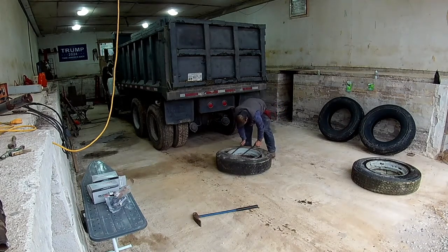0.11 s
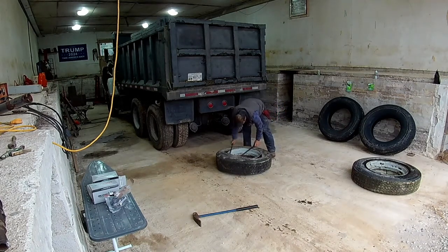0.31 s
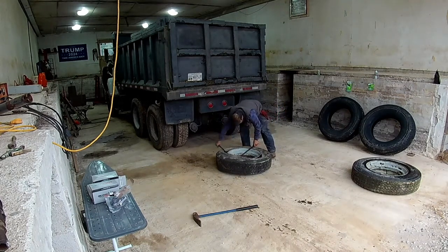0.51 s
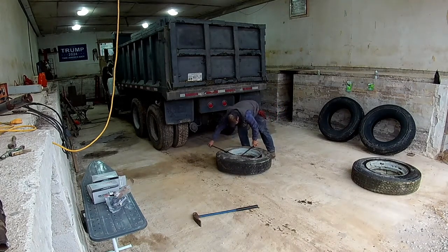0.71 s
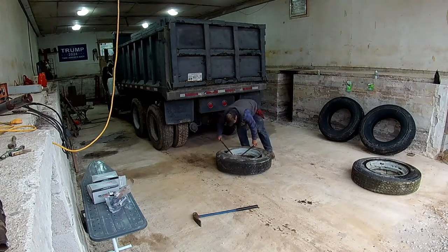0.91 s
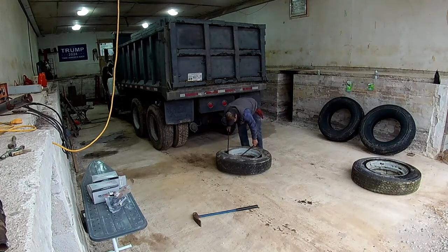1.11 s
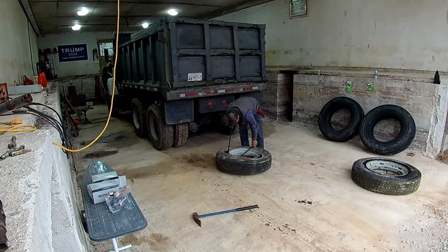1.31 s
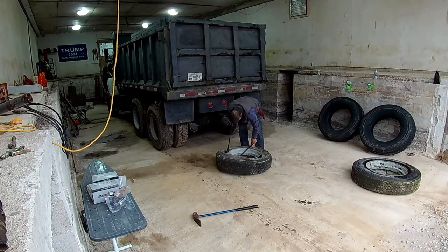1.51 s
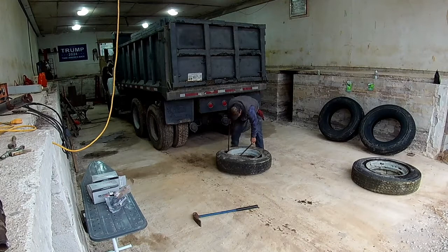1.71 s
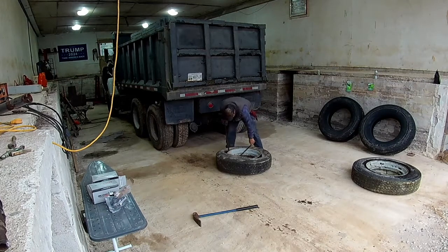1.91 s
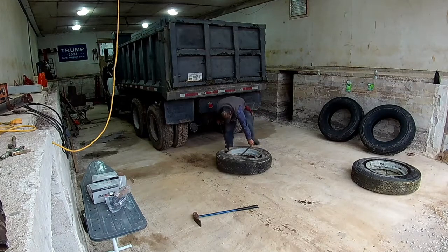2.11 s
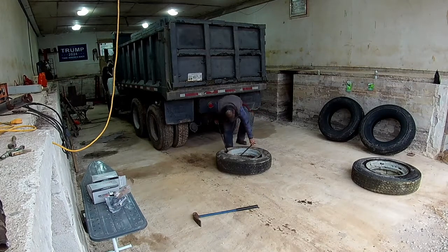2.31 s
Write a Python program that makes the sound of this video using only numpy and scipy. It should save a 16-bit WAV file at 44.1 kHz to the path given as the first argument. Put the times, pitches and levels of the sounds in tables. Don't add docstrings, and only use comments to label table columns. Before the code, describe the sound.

Heavy rubber tire thudding on concrete, tire irons knocking its metal rim, hard garage bay echo

```python
import sys
import numpy as np
from scipy import signal
from scipy.fft import rfft, irfft
from scipy.io import wavfile
from scipy.ndimage import uniform_filter1d

SR = 44100
rng = np.random.default_rng(int(sys.argv[2]) if len(sys.argv) > 2 else 0)


def store_pcm(level_fs):
    pcm = np.round(np.clip(level_fs, -1, 1) * 32767).astype(np.int16)
    wavfile.write(sys.argv[1], SR, np.atleast_2d(pcm).T)


def makeup_ratio(level_db):
    decades = np.asarray(level_db, float) / 20
    return 10 ** decades


N = 110250

# start_s, thud_db, favoured_pitch_hz, clatter_db, clatter_cutoff_hz
BLOWS = [(.214, -28.5, 162, -27.5, 3240), (0.233, -34.5, 136, -45.5, 4000), (.553, -36.5, 236, -77, 1500),
         (0.589, -31.5, 102, -44, 3930), (0.613, -38, 162, -41.5, 5340), (0.727, -42.5, 176, -54.5, 1510),
         (.810, -45.5, 302, -42.5, 2220), (1.080, -57, 162, -46.5, 5250), (1.094, -26, 160, -29.5, 2640),
         (1.107, -31.5, 189, -33.5, 3900), (1.133, -34.5, 180, -38, 5140), (1.29, -46.5, 300, -91, 5250),
         (1.976, -84, 300, -41.5, 4270), (2.297, -39, 104, -88, 990), (2.389, -42.5, 100, -75, 1730),
         (2.443, -42.5, 144, -55, 1200), (2.475, -43, 104, -51, 1290)]
# mode_hz, level_db, t60_s
TIRE_MODES = [(71, -20.5, 0.095), (100.5, 4.5, 0.28), (128, 3, 0.19), (176, 5, 0.3), (201.8, -3, 0.17),
              (242.6, 3.5, 0.11), (300, -1, 0.41), (407.3, 8, 0.1)]
# start_s, level_db, favoured_pitch_hz
FLANGE_HITS = [
    (.2135, -28, 1710),
    (.218, -29, 597),
    (.227, -31.5, 980),
    (.232, -33, 1700),
    (.247, -31.5, 1077),
    (.291, -32.5, 1110),
    (.598, -47.5, 397),
    (.605, -38.5, 1540),
    (1.0955, -37.5, 1500),
    (1.108, -34.5, 1150),
]
# start_s, level_db, favoured_pitch_hz
DISC_HITS = [
    (.8105, -48, 1236),
    (.822, -43, 570),
    (1.975, -40, 1720),
    (1.983, -45, 590),
    (1.989, -43.5, 920),
    (2.475, -68, 1150),
]
# mode_hz, level_db, t60_s
FLANGE_MODES = [(356, -5, 0.066), (457, -6.5, 0.06), (573, 7, 0.026), (772, -4.5, 0.033), (980, 5, 0.04),
                (1042, 0.5, 0.057), (1150, 3, 0.041), (1263, -5, 0.06), (1397, -0.5, 0.035),
                (1516, -6.5, 0.039), (1672, -3, 0.024), (2065, -7, 0.047), (3712, -13.5, 0.065),
                (3985, -14, 0.042)]
# mode_hz, level_db, t60_s
DISC_MODES = [(567, 3.5, 0.075), (868, 0.5, 0.038), (1058, 4, 0.027), (1373.4, -1.5, 0.049),
              (1469, -0.5, 0.031), (2225, -12.5, 0.072), (2584, -9.5, 0.058), (2804, -10, 0.056),
              (3220, -18.5, 0.078), (3335, -27.5, 0.11), (4040, -14, 0.05), (4380, -9, .06),
              (4650, -2.5, 0.05)]
# start_s, level_db
FIRST_IRON_HITS = [
    (.612, -51.5),
]
# mode_hz, level_db, t60_s
FIRST_IRON_MODES = [(2374, 1.5, 0.22), (2700, -17, 0.11), (3395, -5.5, 0.12), (3974, 5, 0.16),
                    (4050, -17.5, 0.13), (4875, 5, 0.18), (4910, -5, 0.27), (5640, -20, 0.17),
                    (5722, -21, 0.85), (5729, -22.5, 0.29), (6130, -23.5, 0.12), (7009, -11.5, 0.15),
                    (7024, -13, 0.14), (9400, -27, 0.17)]
# start_s, level_db
SECOND_IRON_HITS = [
    (1.080, -60),
    (1.103, -54),
    (1.113, -54.5),
]
# mode_hz, level_db, t60_s
SECOND_IRON_MODES = [(2400, -6.5, 0.24), (2580, -3, 0.16), (3250, -5, 0.14), (3580, 3, 0.14),
                     (3940, -13.5, 0.18), (4550, -3, 0.24), (4716, -9.5, 0.62), (4930, -4, .12),
                     (5300, -6, 0.12), (5889, -18, 0.54), (5908, -11.5, 0.47), (7009, -17.5, 0.13),
                     (7050, -25, .25), (7596, -30, 0.18)]
# start_s, level_db
LOOSE_IRON_HITS = [
    (.216, -65),
    (.585, -67),
    (1.1, -56.5),
    (1.15, -63),
    (1.28, -66),
]
# mode_hz, level_db, t60_s
LOOSE_IRON_MODES = [(2174, 2.5, 0.1), (2380, 0.5, 0.14), (2818, -1.5, 0.17), (3023, -4.5, 0.23),
                    (3340, -9.5, 0.37), (3584, -4.5, 0.2), (3803, -9, .25), (4130, -3.5, .3),
                    (4590, -12.5, 0.39), (5170, -19, 0.17), (5160, -22, 0.14), (5660, -21, 0.17),
                    (6460, -25, 0.19), (6500, -32, .2)]
# time_s, level_db
DRAG_PRESSURE = [(0, -100), (.54, -100), (.605, -70), (.63, -100), (.89, -100), (.95, -76), (1.07, -75),
                 (1.11, -73), (1.2, -81), (1.3, -76), (1.42, -95), (1.8, -96), (1.85, -84), (1.96, -84),
                 (1.99, -100), (2.5, -100)]
# time_s, level_db
RUB_PRESSURE = [(0, -100), (.97, -100), (1.03, -62), (1.085, -52), (1.1, -100), (1.77, -100), (1.83, -66),
                (1.9, -70.5), (1.95, -66), (1.975, -100), (2.39, -100), (2.44, -68.5), (2.5, -79)]
# time_s, pitch_hz
RUB_PITCH = [(0, 500), (1.03, 400), (1.085, 684), (1.8, 300), (1.85, 390), (1.9, 694), (1.96, 543),
             (2.4, 507), (2.5, 1080)]
# start_s, level_db, length_s
SPITS = [
    (0.208, -86.5, .045),
    (0.583, -90, 0.061),
    (1.078, -76, 0.044),
    (1.976, -92, .03),
]
# band_hz, t60_s
BAY_T60 = [(60, 0.72), (200, 0.76), (600, 0.78), (1200, 0.98), (2500, 0.79), (5000, 0.46), (12000, 0.26)]
# band_hz, band_level_db
HUM = [(12, -45), (20, -10.5), (116, -1), (274, -12), (452, -16), (491, -21), (667, -20), (1040, -23.5),
       (15500, -64.5)]

TIRE_DB, TIRE_FAVOUR_DB, RIM_FAVOUR_DB = -13, -11, -7.5
HIT_SPREAD_DB, SWELL_HZ = 1.2, 120
CLATTER_DECAY_S, CLATTER_LOW_HZ = 0.006, 343
GRIT_PER_S = 3700
RUB_LUMPS_DB, RUB_WIDTH_DB = 4, -11.5
DIRECT_DB, EARLY_DB, BAY_DB = 0.5, 2.5, -3
EARLY_DECAY_S, BAY_BUILD_S = 0.014, 0.0033
EVEN_BINS = 80
HUM_DB = -57.5
FIZZ_DB, FIZZ_POWER = -18.5, 1.6


def rms_one(x):
    return x / np.sqrt(np.mean(x ** 2) + 1e-20)


def in_time(rows):
    return np.interp(np.arange(N) / SR, *np.transpose(rows))


def at_hz(points, hz):
    table_hz, value = np.transpose(points)
    return np.interp(np.log(hz), np.log(table_hz), value)


def cut(x, hz, kind, order=2):
    return signal.sosfilt(signal.butter(order, hz, kind, fs=SR, output="sos"), x)


def bands(size):
    edges_hz = 22 * 2 ** np.arange(0, 9.8, .5)
    white = rng.standard_normal((2, size))
    out = []
    for k, (low_hz, high_hz) in enumerate(zip(edges_hz, edges_hz[1:])):
        out.append((np.sqrt(low_hz * high_hz), cut(white[k % 2], [low_hz, high_hz], "band")))
    return out


def strike(hits, modes, share_db, favour_db=0, soft=False):
    start_s, hit_db, favour_hz = np.transpose([(*hit, 1)[:3] for hit in hits])
    at = (start_s * SR).astype(int)
    out = np.zeros(N)
    luck = rng.standard_normal((30, 14))
    for k, (hz, mode_db, t60_s) in enumerate(modes):
        lean_db = favour_db * np.log2(hz / favour_hz) ** 2
        level_db = hit_db + mode_db + share_db + lean_db + HIT_SPREAD_DB * luck[:len(at), k]
        clicks = np.full(N, 1e-18)
        clicks[at] = makeup_ratio(level_db) * (-1) ** k
        if soft:
            clicks = cut(clicks, [hz - SWELL_HZ, hz + SWELL_HZ], "band", order=1)
        r = makeup_ratio(-60 / (t60_s * SR))
        w = 2 * np.pi * hz / SR
        out += signal.lfilter([0, np.sin(w)], [1, -2 * r * np.cos(w), r * r], clicks)
    return out


def tire():
    thuds = np.array(BLOWS)[:, :3]
    return cut(strike(thuds, TIRE_MODES, TIRE_DB, TIRE_FAVOUR_DB), [85, 600], "band", order=3)


def clatter():
    size = 4000
    out = np.zeros(N + size)
    decay = np.exp(-np.arange(size) / SR / CLATTER_DECAY_S)
    for (start_s, _, _, level_db, top_hz), noise in zip(BLOWS, rng.standard_normal((len(BLOWS), size))):
        burst = cut(noise * decay, top_hz, "low", order=8)
        burst = cut(burst, 840, "low", order=1)
        burst = cut(burst, CLATTER_LOW_HZ, "high")
        at = int(start_s * SR)
        out[at:at + size] += makeup_ratio(level_db) * burst / np.abs(burst).max()
    return out[:N]


def rim():
    flange = strike(FLANGE_HITS, FLANGE_MODES, -4.5, RIM_FAVOUR_DB)
    disc = strike(DISC_HITS, DISC_MODES, -2.5, RIM_FAVOUR_DB)
    return cut(flange + disc, [300, 4200], "band", order=3)


def irons():
    first = strike(FIRST_IRON_HITS, FIRST_IRON_MODES, -5.5, soft=True)
    second = strike(SECOND_IRON_HITS, SECOND_IRON_MODES, -4, soft=True)
    loose = strike(LOOSE_IRON_HITS, LOOSE_IRON_MODES, -4, soft=True)
    return cut(first + second + loose, 2200, "high")


def grit():
    slips = rng.random(N) < GRIT_PER_S / SR
    return slips * rng.standard_normal(N) * makeup_ratio(1.5 * rng.exponential(1, N))


def drag(grains):
    hiss = cut(grains, [1200, 5000], "band", order=1)
    return makeup_ratio(in_time(DRAG_PRESSURE)) * rms_one(cut(hiss, 5240, "low", order=8))


def rub(grains):
    lumps = makeup_ratio(RUB_LUMPS_DB * rms_one(cut(rng.standard_normal(N), 40, "low")))
    pitch_hz = in_time(RUB_PITCH)
    tone = np.zeros(N)
    for hz in 200 * 2 ** np.arange(0, 3.1, 1 / 3):
        band = rms_one(cut(grains, [hz / 1.12, hz * 1.12], "band"))
        tone += makeup_ratio(RUB_WIDTH_DB * np.log2(hz / pitch_hz) ** 2) * band
    return makeup_ratio(in_time(RUB_PRESSURE)) * rms_one(tone * lumps)


def spits():
    t = np.arange(N) / SR
    level = np.zeros(N)
    for start_s, level_db, length_s in SPITS:
        swell = np.clip((t - start_s) / .015, 0, 1)
        fall = np.exp(-np.maximum(t - start_s - length_s, 0) / .025)
        level += makeup_ratio(level_db) * swell * fall
    hiss = cut(rng.standard_normal(N), 8000, "high", order=4)
    return level * rms_one(cut(hiss, 8800, "low"))


def bay(x):
    size = 60000
    t = np.arange(size) / SR
    late = sum(band * makeup_ratio(-60 * t / at_hz(BAY_T60, hz)) for hz, band in bands(size))
    late = late * (1 - np.exp(-t / BAY_BUILD_S))
    early = rng.standard_normal(size) * (rng.random(size) < .03) * np.exp(-t / EARLY_DECAY_S)
    echo = makeup_ratio(BAY_DB) * late / np.linalg.norm(late) + makeup_ratio(EARLY_DB) * early / np.linalg.norm(early)
    echo[0] = makeup_ratio(DIRECT_DB)
    spectrum = rfft(echo, 2 * size)
    colour = np.sqrt(uniform_filter1d(np.abs(spectrum) ** 2, size=EVEN_BINS))
    even = irfft(spectrum / colour)[:size]
    return signal.fftconvolve(x, even * np.linalg.norm(echo))[:N]


def background():
    settle = 8000
    noise = sum(makeup_ratio(at_hz(HUM, hz)) * band[settle:] for hz, band in bands(N + settle))
    return makeup_ratio(HUM_DB) * rms_one(noise)


def scene():
    grains = grit()
    sources = tire() + clatter() + rim() + irons() + drag(grains) + rub(grains)
    return (bay(sources) + spits() + background())[None]


def low_pass(x):
    return signal.sosfilt(signal.butter(12, 15660, fs=SR, output="sos"), x)


def record(dry):
    level = uniform_filter1d(np.abs(cut(dry, 500, "high")), size=600)
    fizz = makeup_ratio(FIZZ_DB) * level ** FIZZ_POWER * cut(rng.standard_normal(dry.shape), 9300, "high")
    ending = np.clip((N - 1 - np.arange(N)) / 250, 0, 1)
    return low_pass((dry + fizz) * np.sin(ending * np.pi / 2) ** 2)


dry = scene()
out = record(dry)
store_pcm(out)
```